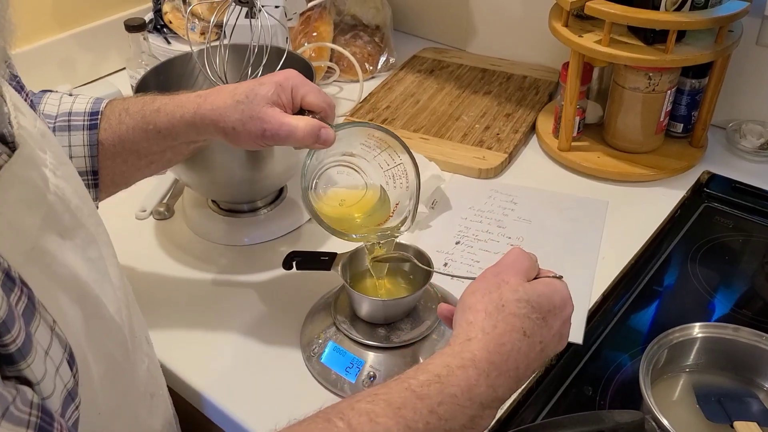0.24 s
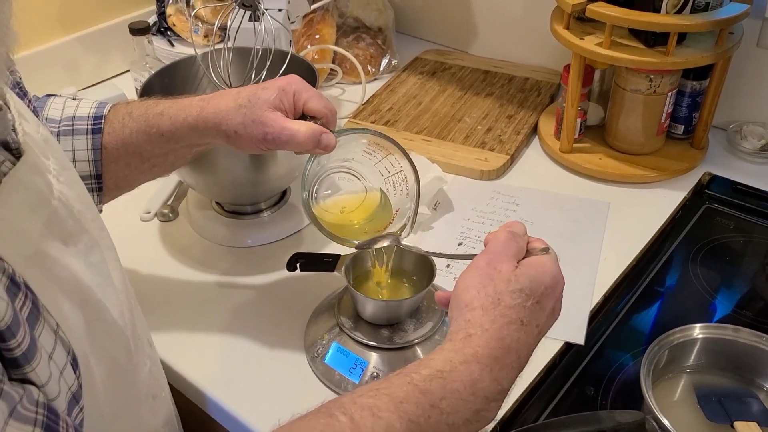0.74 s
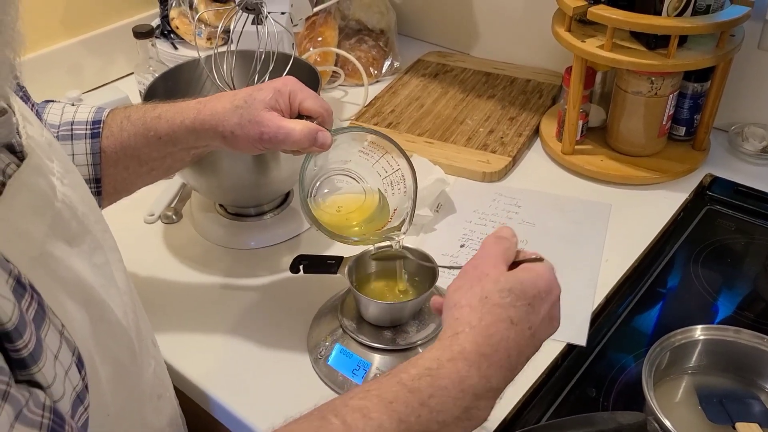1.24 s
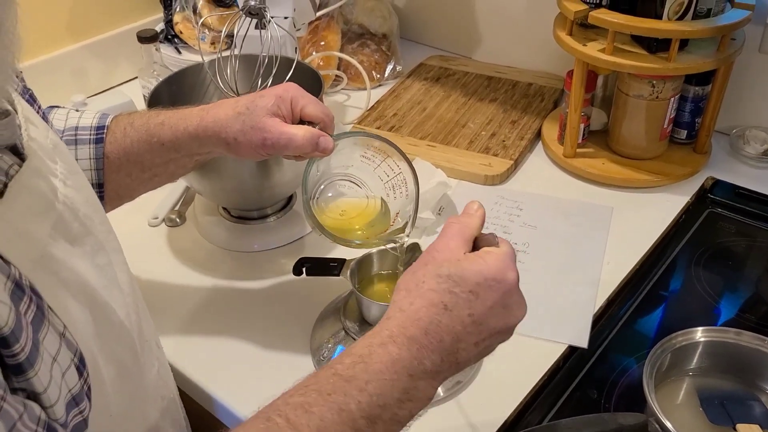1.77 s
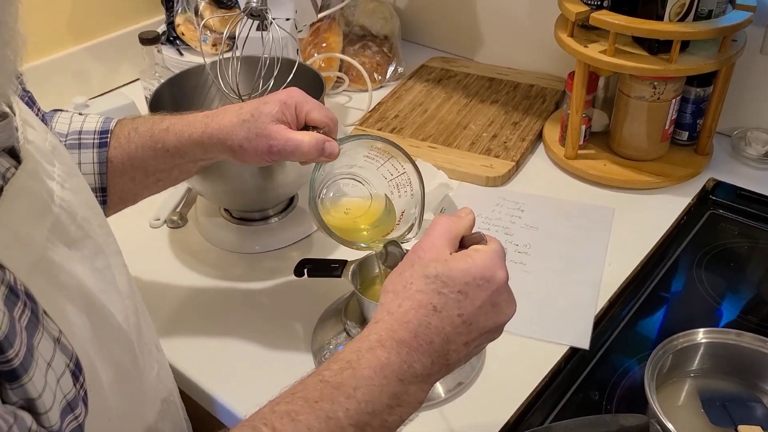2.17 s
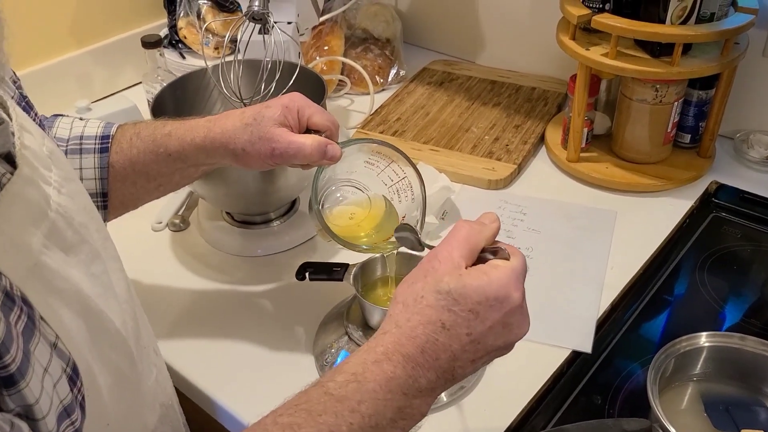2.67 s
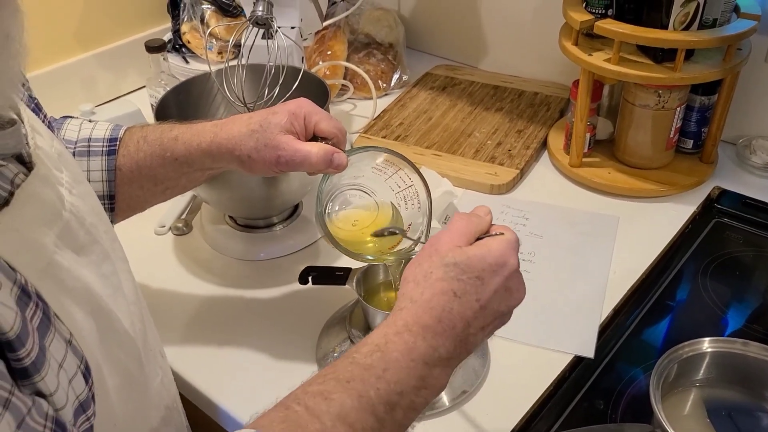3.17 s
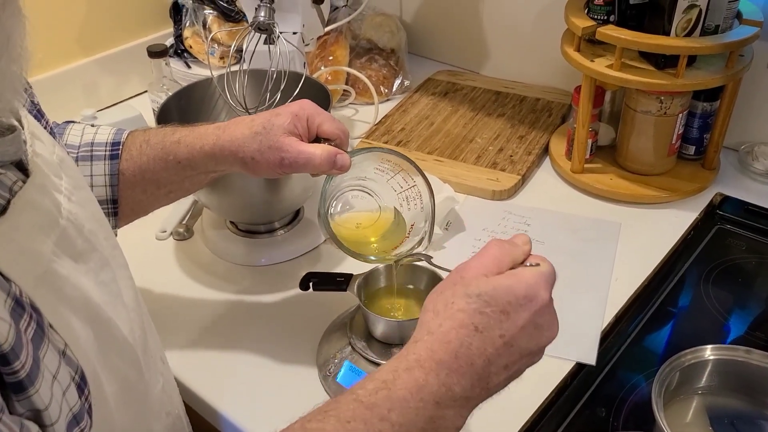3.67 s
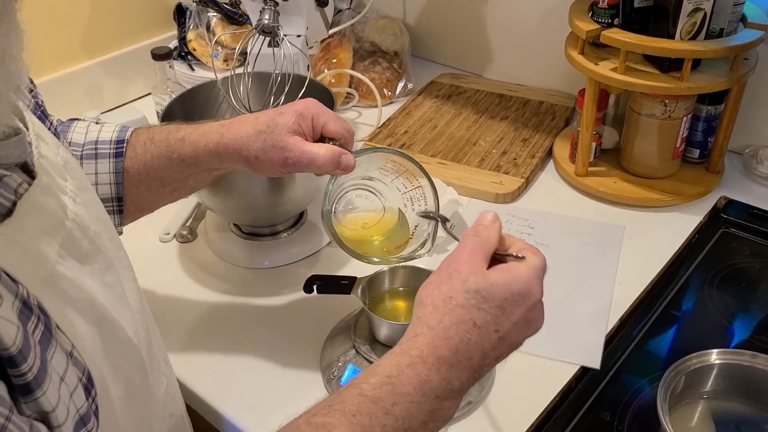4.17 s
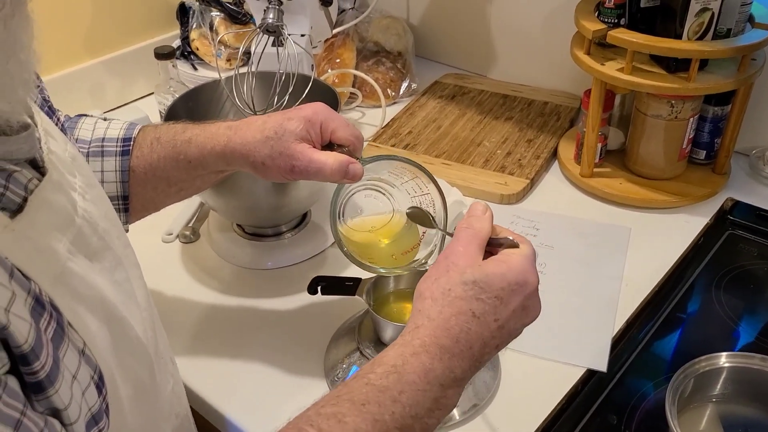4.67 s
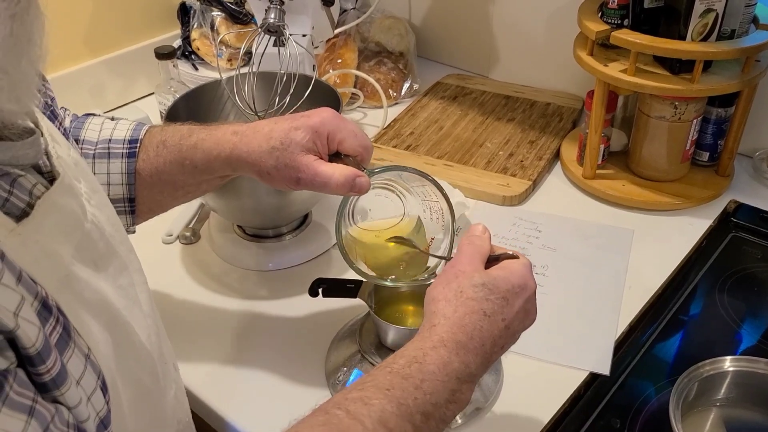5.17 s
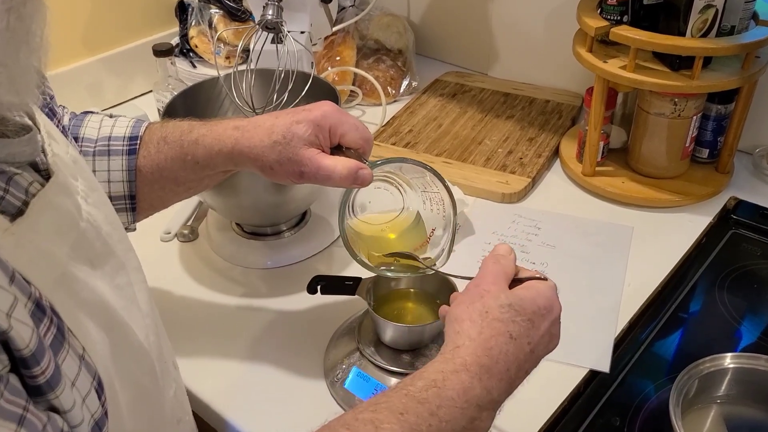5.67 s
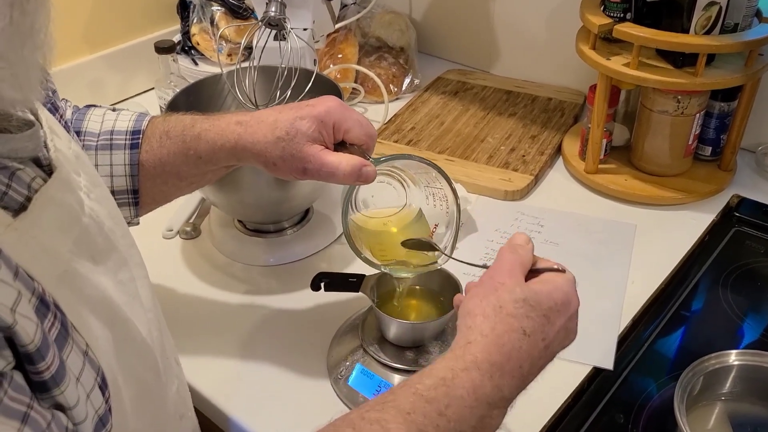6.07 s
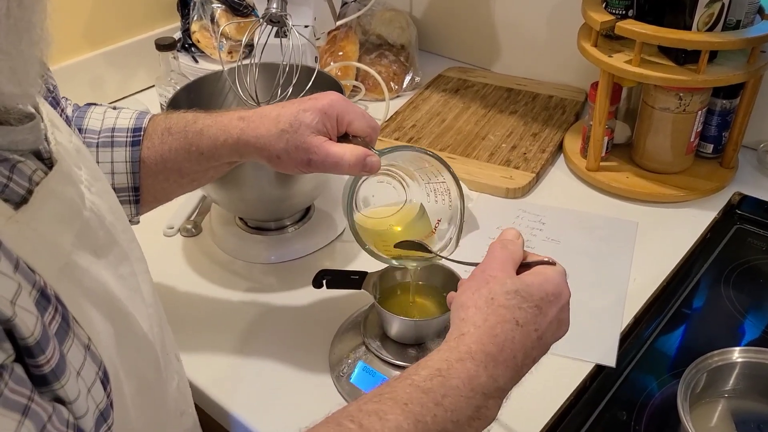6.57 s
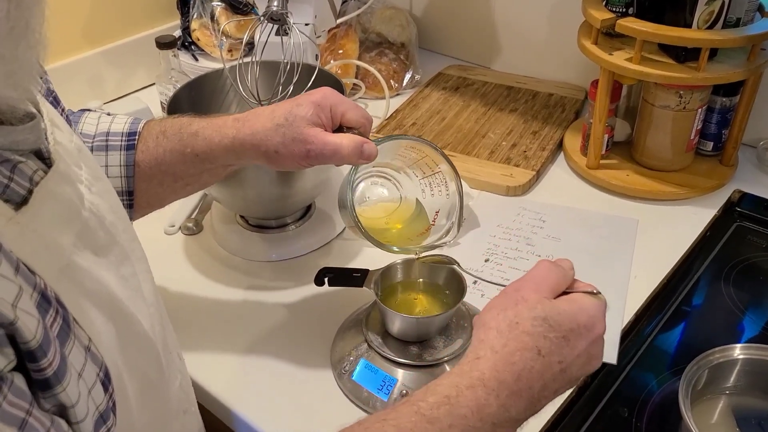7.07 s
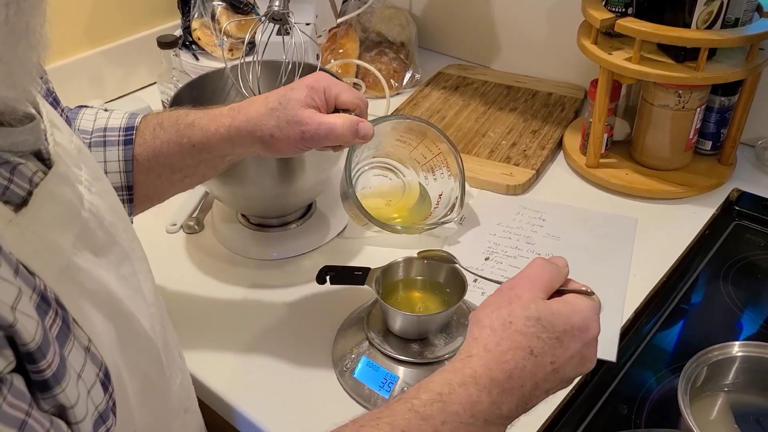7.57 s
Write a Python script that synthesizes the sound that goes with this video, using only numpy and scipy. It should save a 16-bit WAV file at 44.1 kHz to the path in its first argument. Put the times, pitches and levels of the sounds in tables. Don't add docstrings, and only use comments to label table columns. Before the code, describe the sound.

Close up in a small home kitchen, a steel spoon clinks sharply against the lip of a hand-held glass jug, then scrapes with a quick squeak. More taps and chattering contacts follow, with pauses between. Midway, muffled knocks and shifting come through floor and walls while a sleeve brushes. It ends with a rapid chatter and faint far china chinks over quiet fridge hum and hiss.

```python
import sys
import numpy as np
from scipy import signal
from scipy.fft import rfft, irfft, next_fast_len
from scipy.io import wavfile
from scipy.ndimage import uniform_filter1d, map_coordinates

SR = 44100
rng = np.random.default_rng(int(sys.argv[2]) if len(sys.argv) > 2 else 0)


def output_pcm(signal):
    pcm = np.clip(np.atleast_2d(signal).T, -1, 1) * 32767
    wavfile.write(sys.argv[1], SR, np.round(pcm).astype(np.int16))


def decibels_to_gain(level_db):
    exponent = np.asarray(level_db, float) / 20
    return 10 ** exponent


N = 345302

GLASS_HZ = [640, 850, 1300, 1407, 1545, 1745, 1815, 2230, 3230, 3420, 3460, 3670, 3825, 4370]
SPOON_HZ = [4700, 5050, 5430, 6720, 7205, 7680, 8360, 8860, 9500, 10600, 11740, 12200, 12700]
JUG_T60 = np.array([.04, .04, .06, .2, .05, .07, .075, .06, .08, .12, .19, .08, .12, .1] + [.06, .05, .065, .05, .07, .08, .07, .08, .07, .08, .09, .07, .06])
GLASS_DB = [(-14, -4.5, -9, -14, -15.5, -13.5, -8.5, -15, -16.5, -16.5, -14.5, -14.5, -8.5, -20),
            (-28.5, -26.5, -9.5, -1.5, -0.5, -13.5, -15, -11, -24, -3, -6, -7.5, -8, -9),
            (-23, -14.5, -11.5, -9, -18, -16, -17, -27, 5, -13.5, -17, -17, -3.5, -17),
            (-11, -7, -7, -8.5, -6, -1, -13.5, -9, -13, -14, -22, -15, -5.5, -5),
            (-20, -20.5, -8, -7.5, -9, -7, 1, -33, -8, -15, -5.5, 6.5, -3, -29),
            (-25, -19, -2, -4.5, -16, -16, -5.5, -14, -8, -5, -14, -16, -8, -20),
            (-30, -25, -5, 1, -4, -3, -12, -6, -8, -16, 1, -16, -7, -20),
            (-16, -15.5, -9, -9.5, -13.5, -8, -5.5, -10.5, -5.5, -19, -8, -9, -5, -9),
            (-17.5, -12.5, -6, -6, -10, -3, -2, -30, -8, -12, -3.5, 0, -1.5, -13.5)]
SPOON_DB = [(-28, -6.5, -16, -5.5, -23.5, -18.5, -18.5, -11, -29, -10.5, -15, -13, -15.5),
            (-12.5, -17.5, -18, -3.5, -2.5, -26.5, -21, -20.5, -24, -17, -34.5, -14.5, -21.5),
            (-25, -32, -31, -29, -20, -26, -4, -3.5, -17, -12, -7.5, -5, -22),
            (-23, -20, -6.5, -11, -20, -30, -9, -18, -11, -15, -39, -15, -18),
            (-8, -8, -7, -17, -14, -17, -19, -18, -24, -11, -31, -17, -23.5),
            (-25, -22, -16, -3, -22, -24, -10, -14, -25, -15, -23, -24, -22),
            (-18, -14, -20, -12, -5, -13, -21, -16, -12, -11, -24, -22, -22),
            (-18, -15.5, -13.5, -21, -15.5, -16, -15, -14.5, -17.5, -13, -24.5, -16.5, -17),
            (-8.5, -13, -14.5, -21.5, -14.5, -21, -18.5, -19, -22, -14.5, -21, -23.5, -18)]
MODE_HZ = np.array(GLASS_HZ + SPOON_HZ)
SPOT_DB = np.hstack([GLASS_DB, SPOON_DB])
# [f/Hz, level/dB]
CRACK = [(350, -34), (700, -9), (1500, 11.5), (2600, 1.5), (3700, 15.5), (6000, 0), (11000, -5.5),
         (15200, -10.5), (15900, -44.5)]
# [f/Hz, coherence 0-1]
ALIKE = [(60, 0.89), (180, 0.81), (550, 0.38), (1650, 0), (4970, 0.15), (15000, 0)]
# [f/Hz, coherence 0-1]
FAR_ALIKE = [(60, 1), (250, 0.95), (500, 0.75), (1000, 0.035), (3000, 0.06)]


def taps():
    # [t/s, peak level/dB, low modes/dB, high modes/dB, left-right/dB]
    blows = [
        [(0.8156, -17.5, -3, 3, 6), (0.8205, -25, -6, 3.5, 2), (0.8325, -34, 0, -5, 7),
         (0.8385, -35, -1, -7, 6.5), (0.939, -39.5, 1, -3.5, 9), (1.5818, -43.5, -6, -18, 4)],
        [(1.9619, -17, 0.9, 3.5, 4.5), (2.015, -27, -1, -23, 4.5)],
        [(3.3972, -23.5, -6.5, -3.5, 10), (3.4118, -41, 10, 9.5, -4), (3.7693, -38.5, 12.5, -13, 8),
         (3.7982, -47, 13.5, -15, 3)],
        [(4.3308, -21, -1, 2.5, 7), (4.3355, -25.5, -1.5, -4, 7), (4.349, -32, 3.5, -14, 7),
         (4.5702, -36.5, 8.5, 1.5, 5.5)],
        [(6.2077, -67, 5, 13, 14), (6.7361, -24, -6.5, 4, 8.5), (6.8682, -33, -1, 3.5, 4.5)],
        [(0.1714, -44, -12, -16, 6), (0.182, -39, 3, -15, 1), (0.1865, -30.5, -2.5, -5, 7)],
        [(5.2325, -32, 0.5, -1, 7.5), (5.245, -39.5, 6.5, 1, 4.5)],
        [(3.5432, -40, -7, 7.5, 7), (3.6125, -34.5, -3, 1.5, 4), (3.6425, -39, -6, -8, 8),
         (3.6929, -37, 2, 4, 5), (3.7132, -29.5, -1.5, 2.5, 5), (3.7205, -36.5, 9.5, -5, 0),
         (3.732, -40, 14, -18, 5)],
        [(6.9232, -46, 3, -4, 6), (7.0514, -48, 7, 0, 6), (7.0723, -38, -4, -3, 5), (7.0793, -35, -3, -8, 6),
         (7.0928, -25, -13, -6, 6), (7.103, -28, -6, -6, 2), (7.1132, -25.5, -9, 9.5, 4),
         (7.126, -28.5, -3, 11.5, 9), (7.137, -41, -4, -1, 5)],
    ]
    damping = [0.62, 0.74, 0.55, 0.95, 0.43, .7, 1.3, .3, .3]
    crack_over_ring = [-0.7, 1, -0.6, 1, 2, 2, 3.5, 5, -12]
    # [f/Hz, left-right/dB]
    lean = [(1000, -7.5), (1800, -12), (3400, -0.5), (3750, 7.5), (5000, 4), (7000, 14.5), (9000, -8),
            (12500, 7)]
    lead = SR // 40
    out = np.zeros((2, N + SR))
    t = np.arange(-lead, SR // 5) / SR
    after = np.maximum(t, 0)
    hz, t60 = MODE_HZ[:, None], JUG_T60[:, None]
    crack_hz = np.fft.rfftfreq(len(t), 1 / SR)
    ports = rng.standard_normal((2, len(hz), 1))
    lean_db = 1.503 * ports[1] + along(lean, hz)
    for levels, rows, length, crack_db in zip(SPOT_DB, blows, damping, crack_over_ring):
        fading = decibels_to_gain(-60 * after / (t60 * length)) * np.exp(2j * np.pi * hz * t)
        crack_decay = decibels_to_gain(-60 * after / 0.009) + 0.28 * decibels_to_gain(-60 * after / (0.14 * length))
        for s, db, low_db, high_db, pan_db in rows:
            luck = rng.standard_normal((3, len(hz), 1))
            ring_db = levels[:, None] + tone_db(hz, low_db, high_db) + 2.0 * luck[0]
            lag = np.clip(hz / 1200, 0, 1.3) * (ports[0] + 0.22 * luck[1])
            left = decibels_to_gain((lean_db + pan_db) / 2)
            both = np.maximum(np.abs(left * np.exp(1j * lag) + 1 / left) / 2, 0.5)
            ring = []
            for side in (0.5, -0.5):
                phase = np.exp(1j * (3 * luck[2] + side * lag))
                strength = decibels_to_gain(ring_db + side * lean_db) / both * phase
                ring.append((strength[:, 0] @ fading).imag)
            colour = decibels_to_gain(along(CRACK, crack_hz) + tone_db(crack_hz, low_db, high_db))
            noise = irfft(rfft(rng.standard_normal((2, len(t)))) * colour, len(t))
            crack = 1.51 * decibels_to_gain(crack_db + 0.3 * (db + 20.0)) * noise * crack_decay
            rise = 1 - np.exp(-after / 0.00072) + (t < 0) * decibels_to_gain(-24.0 + 1600 * t)
            gain = decibels_to_gain(db - 8.0) * panned(pan_db)[:, None] * rise
            out[:, round(s * SR) - lead:][:, :len(t)] += gain * (ring + crack)
    return out[:, :N]


def tone_db(hz, low_db, high_db):
    return np.interp(hz, [2007, 2886, 4630, 6060], [low_db, 0, 0, high_db])


def slides():
    # [t/s of most pressure, level/dB, rise/s, fall/s, high modes/dB]
    strokes = [
        [(2.028, -37.5, .005, 0.015, -24)],
        [(2.166, -51, 0.013, 0.093, 5.5), (2.32, -62, 0.059, 0.086, -16.5), (2.402, -62, 0.12, 0.038, 2)],
        [(3.55, -71, 0.0054, 0.03, 19), (3.62, -56, 0.0067, 0.14, -1), (3.684, -57, 0.18, 0.052, 0.5),
         (3.72, -45.5, 0.031, 0.073, -25), (3.85, -82, 0.17, 0.059, -28)],
        [(4.715, -63, 0.0072, 0.1, 3)],
        [(5.12, -65, 0.0095, .12, 4)],
        [(6.885, -59.5, .01, 0.15, -12), (7.0, -62.5, 0.19, 0.19, 4), (7.075, -48.5, 0.0093, 0.038, -17),
         (7.116, -42.5, 0.048, 0.018, 5.5)],
    ]
    spots = [1, 7, 7, 4, 4, 8]
    light_db, choke, pan_db = -64, 0.26, 3
    rub = grains(3750, 1.3, channels=1) + 2.5 * grains(4000, 4.05, channels=2)
    rub = rub * decibels_to_gain(2.2 * wobble(45))
    out = np.zeros((2, N))
    for rows, spot in zip(strokes, spots):
        span = slice(round((rows[0][0] - 0.05) * SR), round((rows[-1][0] + 0.2) * SR))
        gain, bright = (g[span] for g in layers(rows))
        pressure_db = 20 * np.log10(gain + 1e-9)
        deep = gain * decibels_to_gain(np.clip(choke * (light_db - pressure_db), -14, 8))
        modes = list(zip(MODE_HZ, 2.1 * 3.9 / JUG_T60, SPOT_DB[spot]))

        def bands(f):
            body = resonances(modes)(f) + 0.018 * decibels_to_gain(along(CRACK, f))
            return body * np.array([f < 2500, (f >= 2500) & (f < 5800), f >= 5800])[:, None]

        low, middle, high = filtered(rub[None, :, span], bands)
        out[:, span] = (deep * low + gain * middle + bright * high) / middle.std()
    return decibels_to_gain(1.5) * panned(pan_db)[:, None] * patchy(out, depth_db=3.5)


def squeak():
    # [t/s, f/Hz, level/dB]
    path = [
        [(2.045, 2070, -65), (2.061, 2060, -39.5), (2.11, 2031, -66)],
        [(2.154, 2220, -49), (2.161, 2012, -31), (2.182, 2018, -36), (2.205, 2076, -36.5), (2.22, 2040, -33),
         (2.257, 1920, -41.5), (2.287, 2027, -50), (2.305, 1980, -83)],
        [(3.07, 10600, -93), (3.13, 11050, -85.5), (3.15, 10750, -89), (3.225, 10250, -90)],
    ]
    gate, hz, db = curves(path)
    return singing(gate * decibels_to_gain(db), hz, overtone_db=-12, rough_db=0.8, drift=0.005, pan_db=6.5, lag=0.6)


def screech():
    # [t/s of the peak, level/dB, rise/s, fall/s]
    bursts = [
        (2.16, -42.5, 0.0063, 0.07),
        (2.205, -53.5, .04, .07),
    ]
    # [f/Hz, width/Hz, level/dB]
    modes = [(3740, 40, -10), (4025, 70, -2), (4420, 200, -9)]
    rough = unit(filtered(rng.standard_normal((2, N)), resonances(modes)))
    return fine(swells(bursts).sum(0)) * panned(7.2)[:, None] * rough


def sung_modes():
    # [t/s of the peak, level/dB, rise/s, fall/s, f/Hz]
    tones = [(2.021, -36, .012, .02, 1500), (2.156, -44.5, .004, .008, 4450),
             (2.168, -40, 0.0084, .03, 4030), (2.192, -42, .012, 0.028, 4035),
             (3.657, -42.5, 0.012, 0.014, 1760), (3.736, -46, .025, 0.012, 3273),
             (3.778, -44, 0.051, 0.0098, 3240), (3.802, -49, 0.016, 0.043, 3250),
             (3.83, -52.5, 0.018, 0.08, 3240), (4.685, -56.5, 0.013, 0.026, 3300),
             (4.735, -55, .02, .03, 3280), (4.778, -54.5, 0.03, 0.017, 3252),
             (4.835, -62, 0.0602, 0.027, 3270), (5.6, -66, 0.047, .05, 3350),
             (6.9, -59, 0.031, 0.095, 1830), (7.0, -60, .1, .09, 1890), (7.112, -43, 0.051, .02, 3715)]
    return singing(*pitched(tones, order=20), overtone_db=-45, rough_db=4.5, drift=0.009, pan_db=2.5, lag=0.5)


def streak():
    # [t/s of the peak, level/dB, rise/s, fall/s, f/Hz]
    whistles = [
        (2.026, -41, .015, 0.036, 3760),
        (2.56, -63, 0.067, .09, 4785),
        (6.965, -56.5, 0.0201, 0.055, 4460),
        (7.03, -62, 0.082, .03, 4800),
    ]
    tone = singing(*pitched(whistles, order=2), overtone_db=-29.5, rough_db=3.5, drift=0.0114, pan_db=2.0, lag=0.6)
    return tone * wobble(300)


def singing(gain, hz, overtone_db, rough_db, drift, pan_db, lag):
    turn = 2 * np.pi * np.cumsum(hz * (1 + drift * wobble(120))) / SR + np.array([[lag], [-lag]])
    octave = np.sin(2 * turn + 0.5 * wobble(350))
    tone = np.sin(turn) + decibels_to_gain(overtone_db + 2.7 * wobble(150)) * octave
    return gain * decibels_to_gain(3.0 + rough_db * wobble(77)) * panned(pan_db)[:, None] * tone


def room(x):
    # [f/Hz, t60/s]
    decay = [(300, 0.422), (2000, 0.3), (6000, 0.24), (14000, 0.2)]
    hz, t, z = signal.stft(rng.standard_normal((2, SR // 2)), SR, nperseg=256)
    tail = signal.istft(z * decibels_to_gain(-60 * t / along(decay, hz)[:, None]), SR, nperseg=256)[1]
    delayed = np.pad(x, ((0, 0), (150, 0)))
    return signal.fftconvolve(delayed, tail / np.linalg.norm(tail[0]), axes=1)[:, :N]


def sleeve():
    # [t/s of the peak, level/dB, rise/s, fall/s, fibre over cloth/dB]
    brushes = [
        (.06, -65.5, 0.35, 0.28, -12),
        (2.515, -64, .012, .1, -21),
        (2.575, -61.5, 0.066, 0.11, -23),
        (3.965, -68, .03, 0.3, -11.5),
        (4.53, -63.5, 0.043, .06, -2.5),
        (4.72, -54, .012, 0.084, -5),
        (5.12, -53, .01, 0.14, -13),
        (5.59, -70, 0.044, 0.083, -18),
        (6.21, -74.5, .01, 0.22, -1.5),
    ]
    # [f/Hz, level/dB per Hz]
    cloth = [(1500, -30), (3000, 3.5), (4000, 3), (5200, -2.5), (6300, -28), (7800, -20.5), (10500, -25),
             (15000, -25), (15800, -70)]
    # [f/Hz, level/dB per Hz]
    fibre = [(5000, -38), (7000, -19), (8800, 5), (12000, -9), (15300, -4.5), (15800, -58)]
    return sum(gain * coloured(colour) * decibels_to_gain(1.6 * wobble(40.04))
               for gain, colour in zip(layers(brushes), (cloth, fibre)))


def drag():
    # [t/s of the peak, level/dB, rise/s, fall/s, f/Hz]
    pulls = [
        (2.565, -53.5, 0.0433, 0.0703, 982),
        (2.66, -54.5, 0.12, 0.077, 730),
    ]
    tone = singing(*pitched(pulls, order=2), overtone_db=-21, rough_db=-1.5, drift=0.0526, pan_db=-2.5, lag=0.55)
    return tone * wobble(260)


def set_down():
    # [t/s, peak level/dB, t60/s, share of the low hollow 0-1]
    knocks = [
        (3.5, -44, 0.092, 0.5),
        (4.712, -30, 0.29, 0.04),
        (5.113, -32, 0.26, 0.11),
        (5.459, -28.5, 0.099, 0.17),
        (5.476, -34.5, 0.056, 0.2),
        (4.732, -27, 0.12, 0.23),
        (7.474, -59, 0.1, 0.2),
        (5.1, -34.5, 0.11, 0.7),
        (5.4, -61, 0.11, 0.1),
    ]
    # [f/Hz, width/Hz, level/dB]
    hollow_modes = [(287, 31, 2), (483, 100, -10.5)]
    # [f/Hz, width/Hz, level/dB]
    clack_modes = [(700, 110, 0), (1080, 90, -12), (1310, 60, -9), (1500, 110, -8), (1850, 100, -18)]
    after = np.arange(SR // 3) / SR
    dull = lambda peaks: lambda f: resonances(peaks)(f) / (1 + (f / 5000) ** 4)
    hollow, clack = (spread(rng.standard_normal((2, N)), dull(peaks), FAR_ALIKE)
                     for peaks in (hollow_modes, clack_modes))
    out = np.zeros((2, N))
    for s, db, t60, share in knocks:
        span = slice(round(s * SR), round(s * SR) + len(after))
        share = np.clip(share, 0, 1)
        envelope = decibels_to_gain(db - 13.5 - 60 * (after / t60) ** 1.47) * (1 - np.exp(-after / 0.0019))
        out[:, span] += envelope * (share * hollow[:, span] + (1 - share) * clack[:, span])
    return out


def far_rumble():
    # [t/s of the peak, level/dB, rise/s, fall/s, lowest mode over the rest/dB]
    shifts = [(.052, -45, 0.19, 0.11, -3), (.282, -49, 0.19, 0.066, -10), (2.59, -63.5, 0.19, 0.15, -21.5),
              (2.732, -55.5, 0.039, 0.17, -2), (4.456, -56.5, 0.08, 0.082, -16),
              (4.577, -50, 0.032, 0.062, -20), (4.717, -37, 0.014, 0.099, -31),
              (4.828, -44, 0.37, 0.7, -15), (4.99, -61.5, 0.13, 0.022, 7.5), (5.136, -31, 0.051, 0.062, -9),
              (5.23, -67, 0.11, 0.057, 13), (5.603, -49.5, 0.15, 0.096, -5),
              (5.761, -47.5, 0.041, 0.14, -14), (7.562, -59.5, 0.075, 0.24, -14.5)]
    # [t/s of the peak, level/dB, rise/s, fall/s, rustle over knock/dB]
    scuffs = [(.052, -54.5, 0.59, 0.24, -6.5), (2.565, -54.5, 0.053, 0.093, -1),
              (2.737, -42.5, 0.026, 0.092, -9), (3.73, -52, .03, 0.15, -15), (4.42, -65, 0.058, 0.15, 1.5),
              (4.578, -73, 0.045, 0.054, -22), (4.734, -43.5, 0.025, 0.081, -9),
              (4.996, -53, 0.78, 0.34, -10), (5.131, -60.5, 0.058, 0.13, 9), (5.604, -61.5, 0.13, 0.11, -4),
              (5.76, -59, 0.079, 0.33, -3.5), (5.83, -61.5, 0.041, .05, -2),
              (5.95, -64.5, .02, 0.048, -11.5), (7.385, -61.5, 0.016, 0.053, 4),
              (7.48, -55.5, 0.013, 0.11, -22), (7.562, -57, 0.079, 0.064, -15)]
    # [f/Hz, width/Hz, level/dB]
    body = [(101.7, 15, -7), (126.1, 20, -2.5), (173, 32, -4.5), (266.6, 16.8, 1.5), (351.3, 31, -4.5),
            (424, 125, -8.5)]
    # [f/Hz, width/Hz, level/dB]
    boom = [(66.2, 5.2, 0)]
    # [f/Hz, width/Hz, level/dB]
    knock = [(594, 310, -3.5), (738, 160, -1.5), (1040, 240, -6), (1260, 150, -3), (1810, 240, -5)]
    # [f/Hz, width/Hz, level/dB]
    rustle = [(1760, 980, -1), (3380, 310, 3), (4510, 850, -4)]
    steep = lambda peaks: lambda f: resonances(peaks)(f) / (1 + (f / (0.99 * peaks[-1][0])) ** 6)
    gains = layers(shifts) + layers(scuffs)
    out = np.zeros((2, N))
    for gain, peaks, lump_db in zip(gains, (body, boom, knock, rustle), (2.6, 1.5, 1.65, 5.1)):
        noise = spread(rng.standard_normal((2, N)), steep(peaks), FAR_ALIKE)
        out += gain * decibels_to_gain(lump_db * wobble(25)) * noise
    return out


def groan():
    # [t/s of the peak, level/dB, rise/s, fall/s, f/Hz]
    creaks = [
        (0.002, -44.5, .01, 0.04, 255.7),
        (0.042, -44, 0.028, 0.14, 261.6),
        (5.775, -35, 0.0449, .06, 61.1),
        (7.488, -62, 0.052, 0.18, 167.9),
        (7.702, -62.5, 0.33, 0.24, 166.8),
    ]
    return singing(*pitched(creaks, order=2), overtone_db=-22.0, rough_db=5.0, drift=0.037, pan_db=1.0, lag=0.1)


def dishes():
    # [t/s, peak level/dB]
    touches = [
        (7.372, -60),
        (7.385, -58),
        (7.475, -67),
        (7.535, -64),
        (7.555, -60.5),
        (7.79, -68),
    ]
    # [f/Hz, level/dB, t60/s]
    china = [(1544, -3.5, .15), (2330, -6, .2), (2850, -3, 0.31), (3175, 0, .15), (3330, -6.5, .15),
             (4100, -8, .12), (4290, -7, .12)]
    out, t = np.zeros((2, N + SR)), np.arange(SR // 4) / SR
    hz, level_db, t60 = np.array(china).T[:, :, None]
    for s, db in touches:
        luck = rng.standard_normal((3, len(china), 1))
        decay = decibels_to_gain(level_db + 2.7 * luck[0] - 60 * t / t60)
        for side in (0, 1):
            ring = decay * np.sin(2 * np.pi * hz * t + 3 * luck[1] + side * luck[2])
            out[side, round(s * SR):][:len(t)] += decibels_to_gain(db - 6) * (1 - np.exp(-t / 0.0037)) * ring.sum(0)
    return out[:, :N]


def kitchen_air():
    # [f/Hz, level/dB per Hz]
    rumble_colour = [(12, -41.5), (20, -11), (59, 1), (87, -21), (109, -6.5), (206, -10.5), (321, -9),
                     (600, -22.5), (780, -54), (1320, -120)]
    # [f/Hz, level/dB per Hz]
    hiss_colour = [(290, -30.5), (500, -3.5), (988, -6), (1420, -7.5), (2850, -13), (4030, -7),
                   (5630, -24.5), (5880, -40), (10400, -22), (15300, -27.5), (15800, -61)]
    # [t/s, level/dB]
    hiss_drift = [(0, 0), (1.4, 1.5), (3, 1), (6, 1), (7.83, -2)]
    # [f/Hz, level/dB]
    fridge = [(59.2, -72), (118.4, -82.5), (296.1, -73), (430.7, -81.5)]
    rumble_db, hiss_db = -62, -69.5
    t = np.arange(N) / SR
    rumble = decibels_to_gain(rumble_db - 2.0 + 0.37 * wobble(2.725)) * coloured(rumble_colour)
    drift_db = np.interp(t, *np.transpose(hiss_drift))
    hiss = decibels_to_gain(hiss_db + drift_db + 0.6 * wobble(1.0)) * coloured(hiss_colour)
    hum = sum(decibels_to_gain(db + 2.0 + 1.465 * wobble(1.9)) * np.sin(2 * np.pi * hz * t + 0.8 * wobble(5))
              for hz, db in fridge)
    return rumble + hiss + hum


def unit(x):
    return x / np.sqrt(np.mean(x ** 2) + 1e-20)


def along(points, hz):
    f, v = np.transpose(points)
    return np.interp(np.log(hz + 1), np.log(f + 1), v)


def filtered(x, response):
    m = next_fast_len(x.shape[-1] + SR // 2)
    spectrum = rfft(x, m) * response(np.fft.rfftfreq(m, 1 / SR))
    return irfft(spectrum, m)[..., :x.shape[-1]]


def resonances(peaks):
    def response(f):
        return sum((-1) ** k * decibels_to_gain(db) * 1j * f * w / (c * c - f * f + 1j * f * w)
                   for k, (c, w, db) in enumerate(peaks))
    return response


def spread(pair, response, alike):
    turn = lambda hz: np.arccos(np.clip(along(alike, hz), 0, 1)) / 2
    mid, side = filtered(pair, lambda hz: response(hz) * [np.cos(turn(hz)), np.sin(turn(hz))])
    return unit(np.array([mid + side, mid - side]))


def coloured(colour):
    return spread(rng.standard_normal((2, N)), lambda hz: decibels_to_gain(along(colour, hz)), ALIKE)


def panned(db):
    return decibels_to_gain(np.array([db / 2, -db / 2]))


def grains(rate, spread_db, channels):
    chance = rng.random((channels, N))
    size = rng.standard_normal((2, channels, N))
    return (chance < rate / SR) * size[0] * decibels_to_gain(spread_db * size[1])


def patchy(x, depth_db):
    z = signal.stft(x, nperseg=512)[2]
    field = uniform_filter1d(rng.standard_normal(z.shape[1:]), size=5, axis=0)
    field = uniform_filter1d(field, size=9, axis=1)
    return signal.istft(z * decibels_to_gain(depth_db * unit(field)), nperseg=512)[1][:, :N]


def wobble(rate):
    knots = rng.standard_normal(int(N * rate / SR) + 9)
    return fine(map_coordinates(knots, [np.arange(0, N + 32, 32) * rate / SR]))


def curves(tables):
    t = np.arange(N) / SR
    gate = sum(np.clip(np.minimum(t - rows[0][0], rows[-1][0] - t) / 0.0069 + 1, 0, 1) for rows in tables)
    s, *cols = np.transpose(sum(map(list, tables), []))
    return [gate] + [np.interp(t, s, c) for c in cols]


def swells(rows):
    s, db, rise, fall = np.array(rows)[:, :4, None].transpose(1, 0, 2)
    late = np.arange(0, N + 32, 32) / SR - s
    return decibels_to_gain(db - 20 * np.where(late < 0, -late / np.abs(rise), late / np.abs(fall)))


def layers(rows):
    gains = swells(rows)
    return fine(gains.sum(0)), fine(decibels_to_gain(np.array(rows)[:, -1]) @ gains)


def pitched(rows, order):
    gains = swells(rows) + 1e-30
    weight = (gains / gains.max(0)) ** order
    return fine(gains.sum(0)), fine(np.array(rows)[:, -1] @ weight / weight.sum(0))


def fine(coarse):
    return np.interp(np.arange(N), np.arange(len(coarse)) * 32, coarse)


def scene():
    spoon = taps() + slides() + screech()
    tones = squeak() + sung_modes() + streak()
    dragged = drag()
    near = spoon + tones + decibels_to_gain(-9.0) * room(spoon + 0.71 * tones + dragged)
    far = dragged + groan() + far_rumble() + set_down() + dishes()
    return near + far + sleeve() + kitchen_air()


def band_limit(x):
    return signal.sosfilt(signal.butter(12, 16500, fs=SR, output="sos"), x)


def record(dry):
    dip = resonances([(6600, 3800, -10.0)])
    mix = filtered(dry, lambda hz: (1 - dip(hz)) * np.where(hz > 15700, decibels_to_gain(-14), 1))
    return band_limit(mix)


dry = scene()
out = record(dry)
output_pcm(out)
```